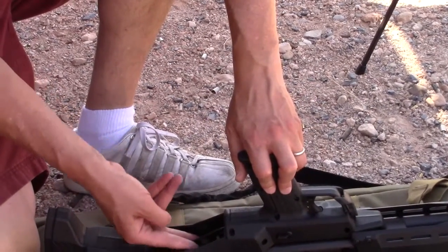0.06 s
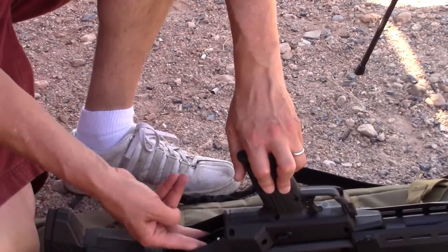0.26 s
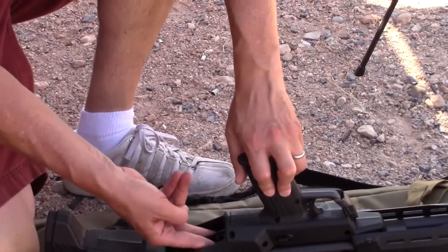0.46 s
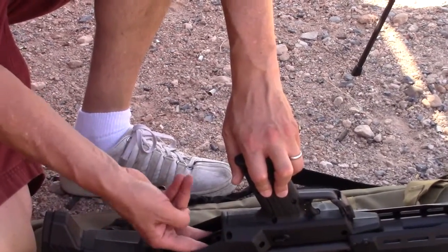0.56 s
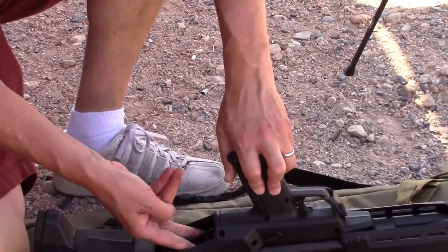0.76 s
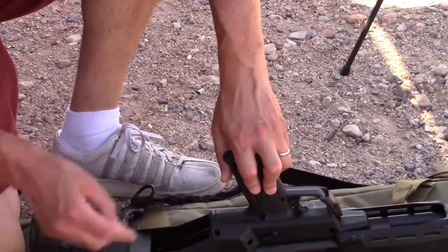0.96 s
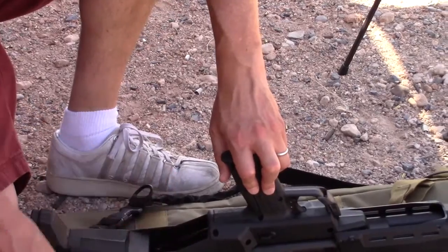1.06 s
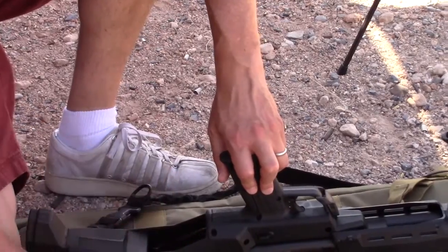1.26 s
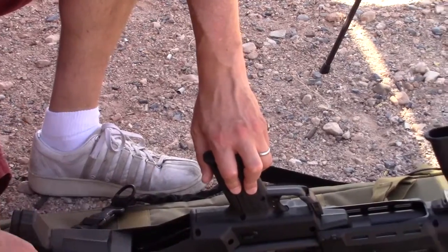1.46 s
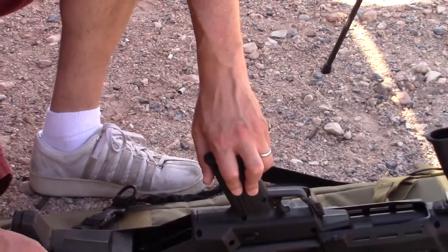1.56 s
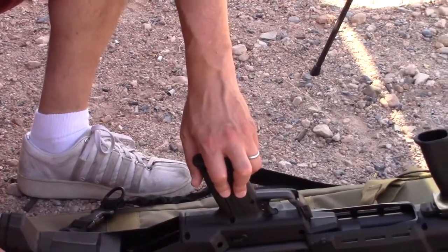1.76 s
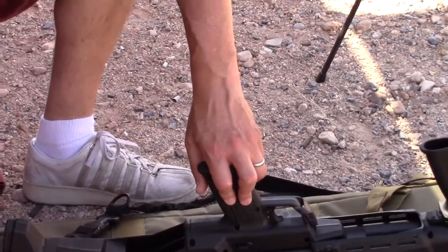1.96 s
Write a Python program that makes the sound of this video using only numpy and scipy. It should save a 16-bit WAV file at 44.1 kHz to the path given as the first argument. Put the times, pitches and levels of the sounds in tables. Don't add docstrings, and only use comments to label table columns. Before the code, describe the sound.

A shotgun shell is loaded into a steel magazine tube, close and dry outdoors. Faint touches and a gritty, hollow slide come at 0.12-0.3 s, then a loud, bright metallic snap at 0.41. A click and short scrape follow at 0.46, a rattling clack with dull thump at 0.6-0.7. Low wind puffs continue; soft cloth brushes at 1.1-1.3, and the gun knocks and settles on its bag from 1.78.

```python
import sys
import numpy as np
from scipy import signal
from scipy.fft import rfft, irfft, next_fast_len
from scipy.io import wavfile
from scipy.ndimage import map_coordinates

SR = 44100
rng = np.random.default_rng(int(sys.argv[2]) if len(sys.argv) > 2 else 0)


def to_wav(s):
    ch = np.atleast_2d(s).T
    pcm = np.round(np.clip(ch, -1, 1) * 32767)
    wavfile.write(sys.argv[1], SR, pcm.astype(np.int16))


def volts_from_db(level):
    exponent = np.asarray(level, float) / 20
    return 10 ** exponent


N = 88200

# t/s, level/dB
REBOUNDS = [(.4113, -1), (.4117, 5), (.4120, 2), (.4127, 2), (.4133, -3), (.4139, -7), (.4147, -8),
            (.4164, -12), (.4180, -13), (.4192, -13), (.4224, -15)]
# f/Hz, density/dB
SNAP_SPECTRUM = [(300, -45), (600, -21), (2100, -2), (4600, -5), (8700, 1), (12000, -3), (14500, -9),
                 (16500, -20)]
# f/Hz, width/Hz, level/dB
CRACK_RESONANCES = [(2150, 400, -4), (3600, 600, -4), (5500, 600, -4), (8900, 1800, -1), (11100, 600, -7),
                    (14300, 1200, 0)]
# f/Hz, level/dB, t60/s
CATCH_MODES = [(1855, -12, .04), (2558, -12, .04), (2939, -4, 0.05), (3613, -10, .04), (5324, -12, 0.07),
               (6050, -8, 0.03), (6848, 0, 0.04), (7700, -8, 0.045), (8840, 3, 0.05), (9900, -10, 0.05),
               (10640, -14, 0.06), (11200, -10, 0.045), (12370, -20, 0.05)]
# start t/s, end t/s, first level/dB, last level/dB
PUSH_STROKES = [
    (.148, .184, -58.5, -42),
    (.187, .193, -38, -37),
    (.195, .208, -33, -31),
    (.209, .258, -29.5, -30),
    (.261, .275, -27, -28),
    (.277, .295, -38, -50),
]
# start t/s, end t/s, first level/dB, last level/dB
RECOIL_STROKES = [
    (.4575, .4605, -36, -34),
    (.461, .466, -31.5, -34),
    (.469, .48, -32.5, -31.5),
    (.484, .5, -46, -50),
    (.505, .538, -50, -58),
]
# start t/s, end t/s, first
# level/dB, last level/dB
SEAT_STROKES = [
    (.119, .145, -52, -51),
    (.149, .18, -48.5, -47),
    (.606, .624, -54, -48.5),
    (.629, .641, -41, -34.5),
    (.649, .662, -34, -33),
    (.668, .681, -43, -38),
    (.684, .706, -59, -53),
]
# f/Hz, density/dB
PUSH_SPECTRUM = [(290, -56.5), (500, -24), (1110, -19.5), (2500, -12), (3810, -4), (4940, -11),
                 (11000, -11), (16000, -22)]
RECOIL_SPECTRUM = [(300, -20), (1000, -19), (2500, -11), (4200, -3), (6000, -10), (8500, -16.5),
                   (11400, -10), (16000, -24)]
SEAT_SPECTRUM = [(240, -39), (400, -3), (719, 7.5), (906, 1), (2020, 8.5), (4580, 0.5), (7750, -5.5),
                 (16000, -27.5)]
# f/Hz, width/Hz, level/dB
TUBE_RESONANCES = [(3100, 300, -6), (3850, 450, -2), (4250, 250, -4), (6900, 640, -4), (7800, 200, 0),
                   (9950, 400, -3), (10800, 350, 5), (11300, 300, 6), (14300, 2200, 3)]
# t/s, peak level/dB, f/Hz
TICKS_AT = [(.1246, -33, 3300), (.1476, -35, 8260), (0.1481, -31.5, 1920), (0.159, -31.5, 3500),
            (0.2617, -28, 5000), (.268, -26, 1840), (0.4607, -15, 8500), (0.4609, -20, 2790),
            (0.6178, -38, 2540), (.6355, -26.5, 7920), (0.6365, -30, 2510), (0.6515, -23, 7900),
            (.6550, -21, 1980), (.6562, -19, 9300), (.6605, -20, 7400), (0.677, -36, 8000),
            (1.2880, -52, 6000), (1.3553, -51.5, 5960), (1.419, -50.5, 9470), (1.4353, -46.5, 4870),
            (1.5445, -43, 7460), (1.0862, -44, 8000), (.4575, -30, 2000), (.4735, -24, 4200),
            (.4795, -26, 4200), (.5045, -44, 2600), (.6500, -24, 7900), (.6485, -26, 1900),
            (.6285, -36, 2200), (.675, -33, 6700), (1.527, -54, 7000), (1.867, -50, 6800),
            (1.985, -50, 7500), (1.7805, -44, 9000), (1.7877, -41.5, 7000), (1.8402, -38.5, 5100),
            (1.947, -48.5, 2890), (1.9894, -43, 2845)]
# f/Hz, level/dB, t60/s
STEEL_MODES = [(5959, -16, .3), (6320, -10, .38)]
# t/s, level/dB, f/Hz, t60/s
KNOCKS_AT = [(0.267, -35.5, 285, 0.044), (.272, -41, 774, 0.085), (.416, -39, 700, 0.034),
             (0.424, -42.5, 284, .06), (.637, -36, 603, 0.039), (0.653, -31.5, 303.5, .07),
             (.662, -27, 95, 0.07), (0.6735, -30, 110, 0.04), (.641, -36, 140, .05),
             (1.285, -38, 580, 0.035), (1.782, -37, 860, 0.025), (1.788, -30, 785, .035),
             (1.789, -37, 370, 0.04), (1.786, -40, 1080, .025), (1.838, -46.5, 377, .05),
             (1.866, -45, 863, 0.044), (1.99, -48, 740, 0.03), (.664, -49, 748, 0.25),
             (1.5444, -42, 4150, 0.015), (1.818, -48, 4160, .012), (1.783, -39, 4300, 0.012),
             (1.791, -39, 3892, 0.022), (1.790, -43, 5303, .02), (1.792, -45, 4400, .02),
             (1.293, -44, 290, .04), (.268, -42, 7830, .07), (.506, -50, 600, .04), (1.809, -46, 600, .02),
             (1.897, -48, 700, .02), (.662, -33, 190, 0.07)]
# start t/s, end t/s, first level/dB, last level/dB
CLOTH_STROKES = [
    (1.092, 1.095, -62, -60),
    (1.115, 1.14, -58, -57),
    (1.165, 1.205, -55.5, -52.5),
    (1.21, 1.3, -67, -60.5),
]
# start t/s, end t/s, first level/dB, last level/dB
BAG_STROKES = [
    (1.781, 1.797, -41.5, -43),
    (1.805, 1.91, -52.5, -56),
    (1.93, 2.0, -59.5, -60),
]
# f/Hz, density/dB
CLOTH_SPECTRUM = [(240, -26), (400, 5.5), (1400, -13.5), (2500, -6.5), (5500, -16), (8500, -10.5),
                  (16000, -29.5)]
BAG_SPECTRUM = [(150, -52), (250, -8.5), (367, -7.5), (586, -6.5), (775, -3.5), (1310, -14.5),
                (6940, -22.5), (16000, -46)]
# delay t/s, level/dB
GROUND_ECHOES = [(.00006, -8), (.0031, -12), (.0065, -11)]
# start t/s, end t/s, first level/dB, last level/dB
WIND_PUFFS = [(.36, .43, -56, -60), (.52, .57, -68, -64), (.6, .645, -58.5, -40), (.69, .77, -41, -50),
              (.85, .91, -43, -44), (.92, 1.07, -41, -46), (1.1, 1.16, -56, -56), (1.185, 1.225, -48, -50),
              (1.245, 1.3, -41, -44), (1.315, 1.39, -46, -43), (1.4, 1.445, -53, -56),
              (1.455, 1.495, -45, -47), (1.62, 1.76, -55, -64)]
# f/Hz, density/dB
PUFF_SPECTRUM = [(20, -44), (45, -15), (85, -1), (120, 0), (190, -11), (350, -28), (700, -36), (1500, -120)]
# t/s, level/dB
BREEZE_LEVEL = [(0, -54), (.15, -52), (.35, -55), (.8, -64), (1.2, -61), (1.6, -64), (2, -58.5)]
# f/Hz, density/dB
BREEZE_SPECTRUM = [(59, -49), (110, -15), (300, 0), (489, -7), (517, -4), (795, -18), (1500, -22.5),
                   (1950, -50.5), (3300, -120)]
AIR_SPECTRUM = [(120, -31), (200, -5), (500, -3), (850, -2), (8420, -18.5), (15000, -29), (15900, -31)]
# f/Hz, correlation/1
PUFF_CORRELATION = [(60, .95), (130, .8), (250, .6), (500, .6)]
AIR_CORRELATION = [(100, 1), (900, 0.68), (3800, .72), (15000, 0.94)]


def unit(x):
    return x / np.sqrt(np.mean(x ** 2) + 1e-20)


def along(points, hz):
    f, value = np.transpose(points)
    return np.interp(np.log(hz + 1), np.log(f + 1), value)


def wobble(rate):
    knots = rng.standard_normal(int(N * rate / SR) + 4)
    return map_coordinates(knots, [np.arange(N) * rate / SR])


def filtered(x, response):
    m = next_fast_len(N + SR // 2)
    return irfft(rfft(x, m) * response(np.fft.rfftfreq(m, 1 / SR)), m)[..., :N]


def peaks(table, f, db=0):
    return 1 + sum(volts_from_db(level + db) * 1j * f * width / (c * c - f * f + 1j * f * width)
                   for c, width, level in table)


def strokes(rows, rise, fall):
    t = np.arange(N) / SR
    total = np.zeros(N)
    for start, end, first, last in rows:
        times = [start - 3 * rise, start, end, end + 3 * fall]
        total += volts_from_db(np.interp(t, times, [first - 90, first, last, last - 90]))
    return total


def scrape(rows, spectrum, grain_db, lump_db, tube=0, rise=.0027):
    grit = rng.standard_normal(N) * volts_from_db(grain_db * wobble(2500) + lump_db * wobble(250))

    def colour(f):
        return volts_from_db(along(spectrum, f)) * (1 + tube * (peaks(TUBE_RESONANCES, f) - 1))

    return strokes(rows, rise, .016) * unit(filtered(grit, colour))


def snap():
    snap_s, snap_db = .4112, -9
    now = np.arange(N) / SR
    t = np.maximum(now - snap_s, 0)
    burst = sum((now >= s) * volts_from_db(db - 60 * np.abs(now - s) / .003) for s, db in REBOUNDS)
    places = [round(s * SR) for s, db in REBOUNDS]
    spikes = np.bincount(places, [volts_from_db(db + 9) for s, db in REBOUNDS], N)
    crack = volts_from_db(snap_db) * (spikes + burst * rng.standard_normal(N))
    chatter_level = volts_from_db(snap_db - 12 - 60 * t / .075 + 1.5 * wobble(900))
    chatter = (t > 0) * chatter_level * rng.standard_normal(N)
    bell = np.zeros(N)
    for hz, db, t60 in CATCH_MODES:
        bell += volts_from_db(db - 60 * t / t60 + 1.5 * wobble(300)) * np.sin(2 * np.pi * hz * t)
    bell *= volts_from_db(-22) * (1 - np.exp(-t / .001))

    def colour(f):
        return volts_from_db(along(SNAP_SPECTRUM, f)) * peaks(CRACK_RESONANCES, f, 3)

    return filtered(crack + chatter, colour) + bell


def shell_slides():
    push = scrape(PUSH_STROKES, PUSH_SPECTRUM, 2, .4, tube=.96)
    recoil = scrape(RECOIL_STROKES, RECOIL_SPECTRUM, 2.2, .8, tube=.7)
    seat = scrape(SEAT_STROKES, SEAT_SPECTRUM, 2.1, 1.5, tube=.267)
    return push + recoil + seat


def ticks():
    q, t60, top_hz = 1.26, .011, 11400
    out, t, f = np.zeros(N + SR), np.arange(2048) / SR, np.fft.rfftfreq(2048, 1 / SR)
    envelope = volts_from_db(-2.5 - 60 * t / t60) * (1 - np.exp(-t / .0003))
    for s, db, hz in TICKS_AT:
        width = hz / q
        resonance = 1j * f * width / (hz * hz - f * f + 1j * f * width)
        noise = rfft(rng.standard_normal(2048))
        band = irfft(noise * resonance ** 2 / (1 + (f / top_hz) ** 8))
        out[round(s * SR):][:len(t)] += volts_from_db(db) * envelope * unit(band)
    return out[:N]


def ring(drive):
    t = np.arange(SR // 2) / SR
    modes = np.zeros(len(t))
    for hz, db, t60 in STEEL_MODES:
        level = volts_from_db(db - 60 * t / t60 + 2.5 * wobble(90)[:len(t)])
        modes += level * np.sin(2 * np.pi * hz * t + 1.3 * wobble(90)[:len(t)])
    haze = rng.standard_normal(len(t)) * volts_from_db(-60 * t / .22)
    response = volts_from_db(-53) * modes + volts_from_db(-21) * haze / np.linalg.norm(haze)
    return signal.fftconvolve(drive, response)[:N]


def knocks():
    out, t = np.zeros(N + SR), np.arange(SR // 4) / SR
    for s, db, hz, t60 in KNOCKS_AT:
        envelope = volts_from_db(db + 5 - 60 * t / t60) * (1 - np.exp(-t / .0025))
        out[round(s * SR):][:len(t)] += envelope * np.sin(2 * np.pi * hz * t)
    return out[:N] * volts_from_db(1.5 * wobble(200))


def cloth_and_bag():
    cloth = scrape(CLOTH_STROKES, CLOTH_SPECTRUM, 1.2, 1.2, rise=.025)
    return cloth + scrape(BAG_STROKES, BAG_SPECTRUM, 1.5, 1.5)


def ground(gun, skew):
    return volts_from_db(-13.5) * sum(volts_from_db(db) * np.roll(gun, round(s * skew * SR)) for s, db in GROUND_ECHOES)


def stereo(spectrum, correlation):
    def response(hz):
        angle = np.arccos(np.clip(along(correlation, hz), -1, 1)) / 2
        return volts_from_db(along(spectrum, hz)) * np.array([np.cos(angle), np.sin(angle)])

    mid, side = filtered(rng.standard_normal((2, N)), response)
    return unit(np.array([mid + side, mid - side]))


def steadied(pair):
    return pair / (np.abs(signal.hilbert(pair.mean(axis=0))) + .2) ** .6


def weather():
    flutter = unit(volts_from_db(1.5 * wobble(25)) * steadied(stereo(PUFF_SPECTRUM, PUFF_CORRELATION)))
    puffs = (volts_from_db(-64) + strokes(WIND_PUFFS, .022, .035)) * flutter
    strength = volts_from_db(np.interp(np.arange(N) / SR, *np.transpose(BREEZE_LEVEL)))
    breeze = strength * volts_from_db(2.5 * wobble(25)) * stereo(BREEZE_SPECTRUM, AIR_CORRELATION)
    air = volts_from_db(-61 + .7 * wobble(5.9)) * stereo(AIR_SPECTRUM, AIR_CORRELATION)
    return puffs + breeze + air


def scene():
    shell = shell_slides()
    soft = cloth_and_bag()
    hard = shell + snap() + ticks()
    gun = hard + ring(hard) + soft + knocks()
    return gun + np.array([ground(gun, 1.0), ground(gun, 2.4)]) + weather()


def top_cut(x):
    return signal.sosfilt(signal.butter(12, 16740, fs=SR, output="sos"), x)


def record(dry):
    ceiling, knee = .9, 4
    low_cut_hz, top_hz, top_edge_hz = 38, 15730, 45
    held = dry / (1 + np.abs(dry / ceiling) ** knee) ** (1 / knee)

    def band(hz):
        treble_edge = (1 - np.tanh((hz - top_hz) / top_edge_hz)) / 2
        return treble_edge * (1j * hz / (low_cut_hz + 1j * hz)) ** 2

    return top_cut(filtered(held, band))


dry = scene()
out = record(dry)
to_wav(out)
```